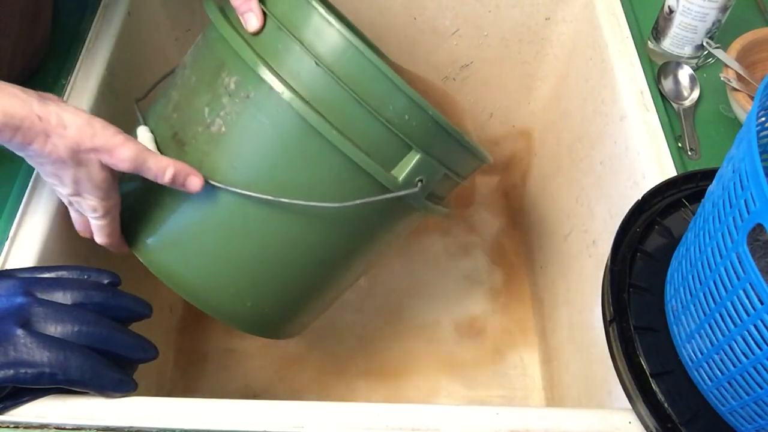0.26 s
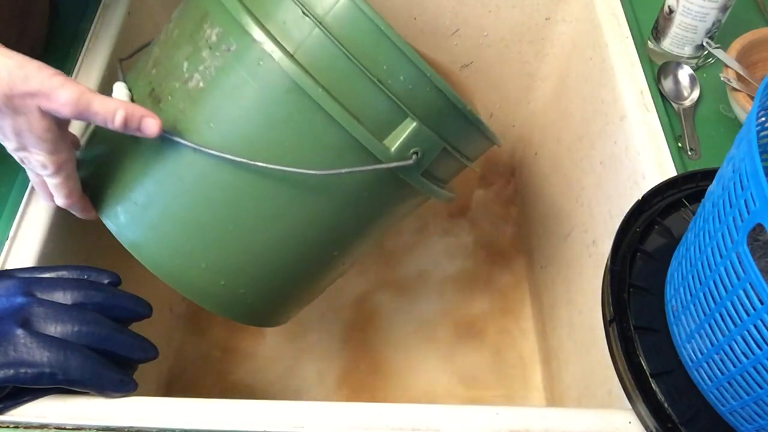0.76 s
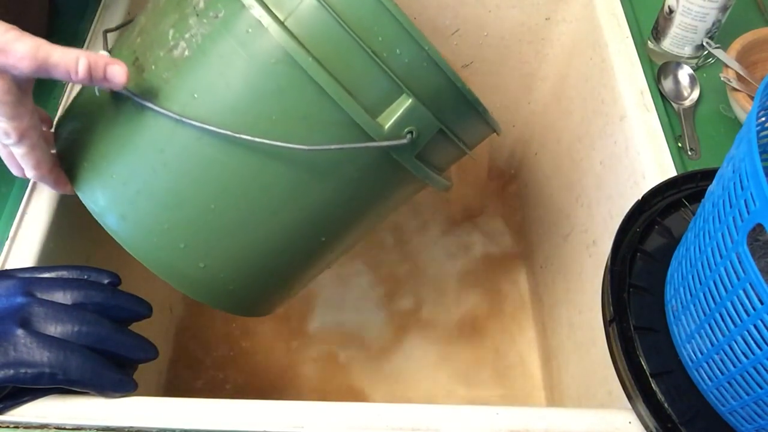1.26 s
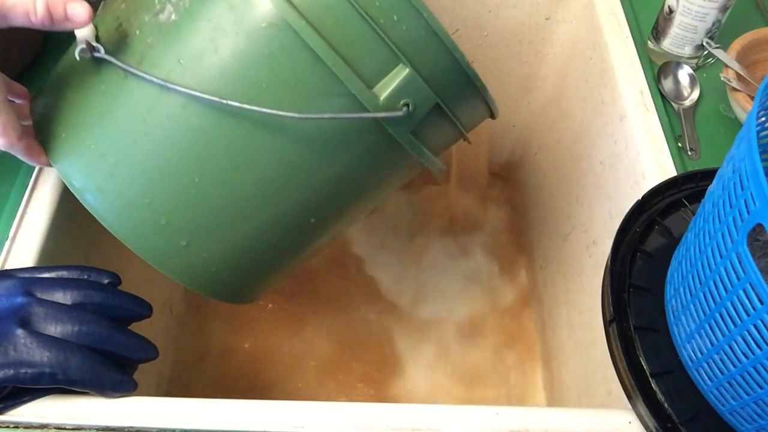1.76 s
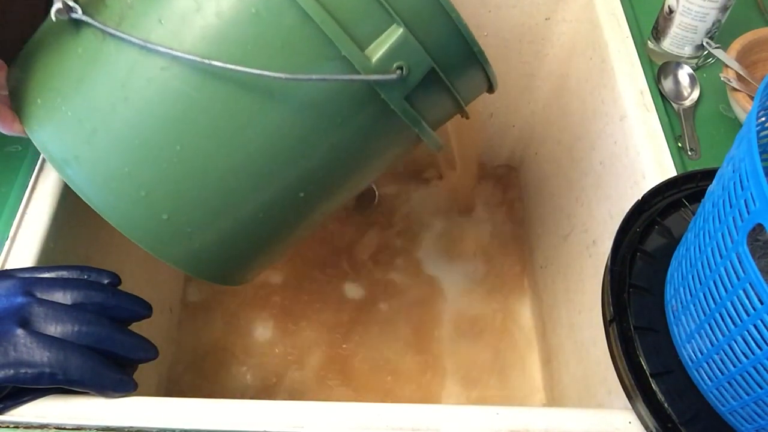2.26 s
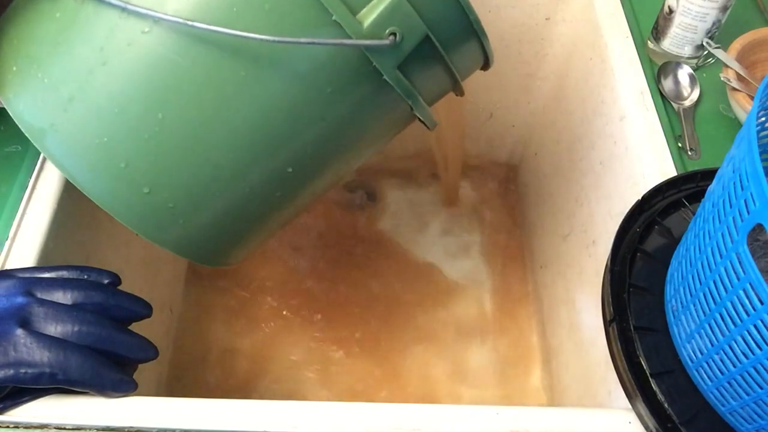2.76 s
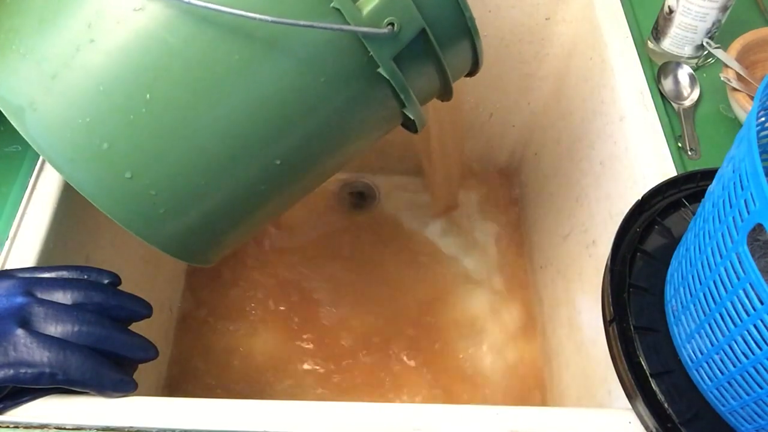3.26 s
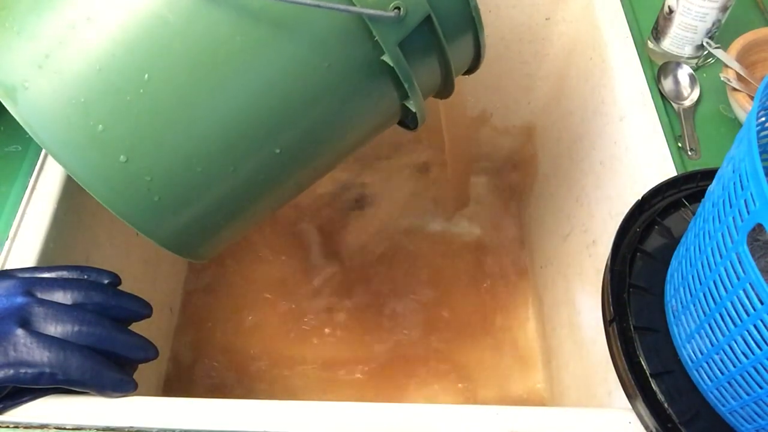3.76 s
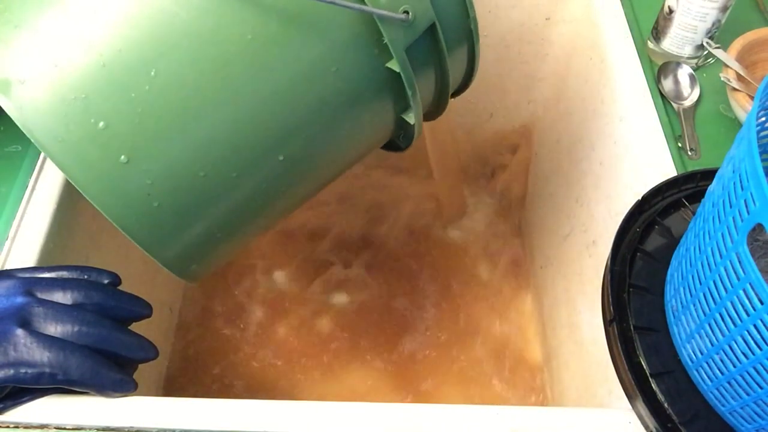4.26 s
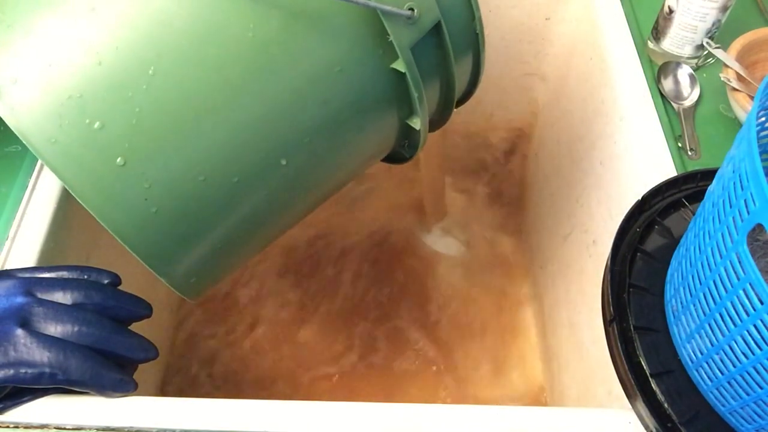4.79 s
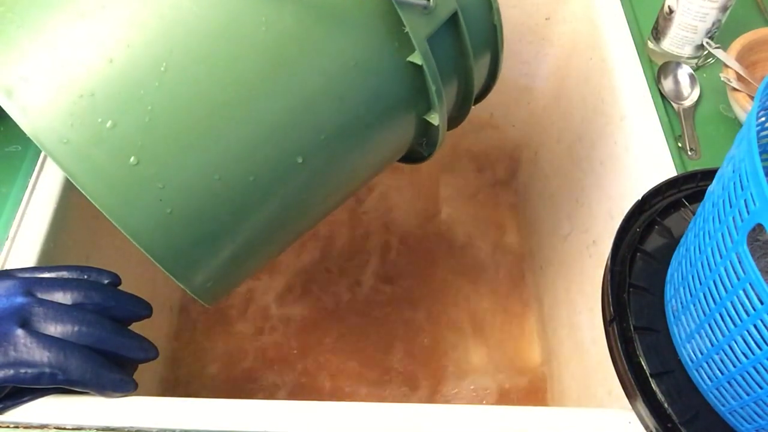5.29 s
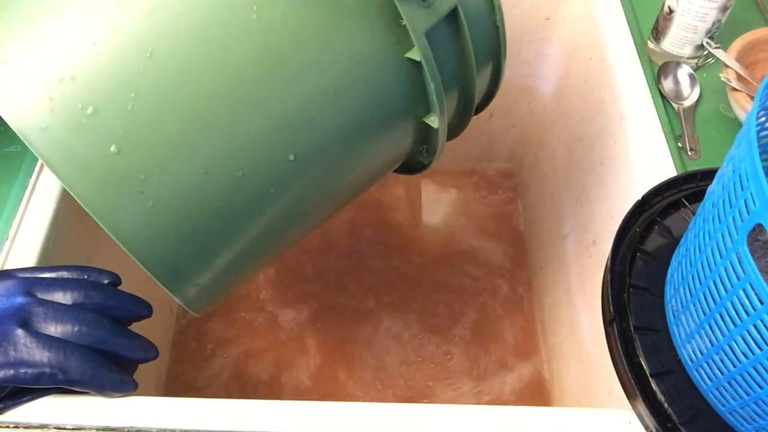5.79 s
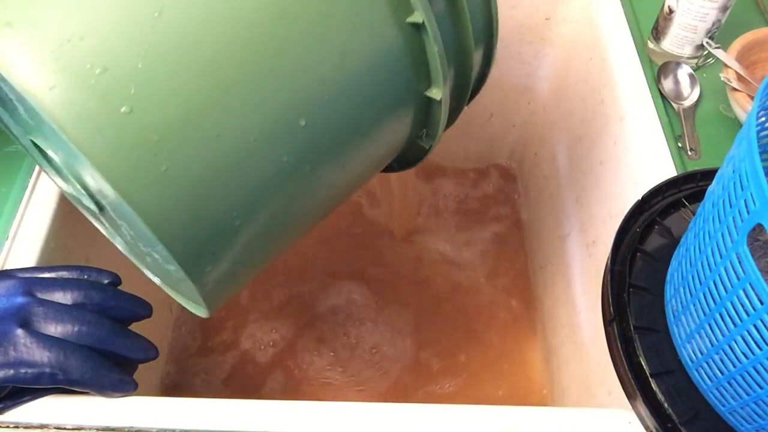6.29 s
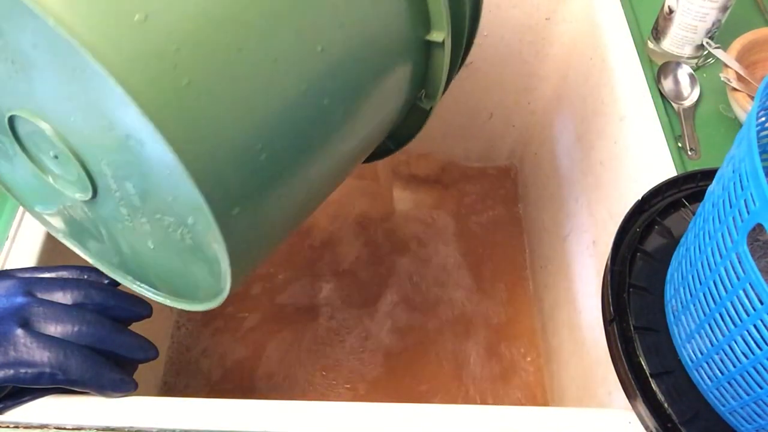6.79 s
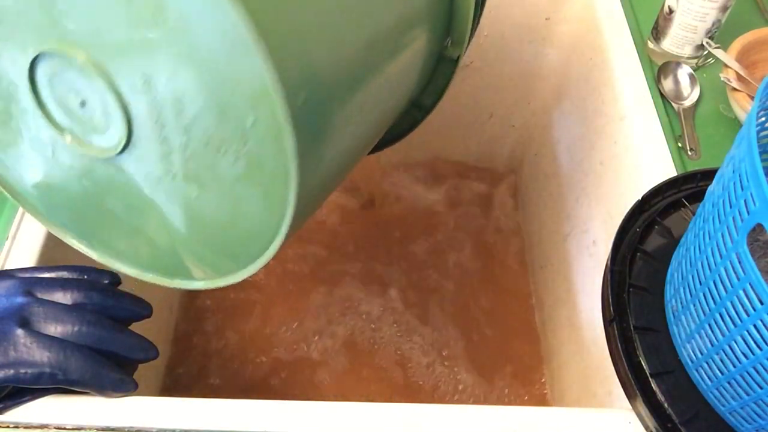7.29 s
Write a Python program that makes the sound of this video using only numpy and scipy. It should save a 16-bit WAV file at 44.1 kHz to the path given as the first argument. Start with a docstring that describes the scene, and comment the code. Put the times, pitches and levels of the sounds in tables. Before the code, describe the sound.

Close-up water gushes from a tipped bucket into a deep basin, starting thin, growing fuller and lower with gurgles and thumps, then weakening and surging briefly.

```python
"""A deep utility sink, heard close up: a bucket is emptied into it, the same in both channels.
The stream hisses as spray (tiny ringing drops over noise), drives clouds of bubbles into the pool (damped
sines that rise in pitch) and drums on the floor (random impacts through the modes of the basin).
Plunges, thumps, slaps, gulps and ticks on the wall stand out at listed times. Plinks, gurgles and blips
scatter at random, and short noise tails make the walls of the basin answer."""
import sys
import numpy as np
from scipy import signal
from scipy.fft import rfft, irfft, next_fast_len
from scipy.io import wavfile
from scipy.ndimage import map_coordinates

SR = 44100
rng = np.random.default_rng(int(sys.argv[2]) if len(sys.argv) > 2 else 0)


def store_wav(level_fs):
    """Save 16-bit WAV to argv[1]."""
    pcm = np.round(np.clip(np.atleast_2d(level_fs), -1, 1) * 32767)
    wavfile.write(sys.argv[1], SR, pcm.T.astype(np.int16))


N = 332646
TIME = np.arange(N) / SR

# colour of the mist: (frequency [Hz], filter gain [dB])
SPRAY_COLOUR = [(500, -69), (1200, -10), (3000, -4.5), (5000, -5), (7300, -6), (9000, -4), (10500, -5),
                (12000, -2.5), (13500, 0.5), (15500, -2)]
COARSE_PER_FLOW = 0.13  # a weak stream throws fewer coarse droplets (extra dB per dB of flow)


def spray(level_db, flow_db, count=30000, size=48):
    """Countless droplets and tiny bubbles crackle over a fine mist, in quick spurts."""
    start = rng.uniform(0, N / SR, count)
    hz = rng.uniform(2500, 16000, count)
    gain = amp(2 * bounded_normal(count)) * np.sqrt(hz)
    crackle = unit(bubbles(start, hz, gain, cycles=2, rise=0, size=size))
    mist = 1.2 * rng.standard_normal(N)
    hiss = filtered(crackle + mist, lambda f: amp(along(SPRAY_COLOUR, f)))
    hiss = band_unit(hiss, 7300, 13760)
    # coarse and fine droplets each spurt by themselves, and also together as the stream gushes
    coarse = lowpass(hiss, 11500, order=12)
    fine = hiss - coarse
    coarse = coarse * amp(COARSE_PER_FLOW * flow_db)
    hiss = sum(part * spurts(depth_db=1.17, life=0.014, count=500) for part in (coarse, fine))
    gush = spurts(depth_db=1.03, life=0.01, count=500)
    return walls(hiss * gush, wet_db=-8.5) * amp(level_db)


# colour of the bubbling: (frequency [Hz], filter gain [dB])
FROTH_COLOUR = [(500, -34), (950, -6), (1200, -2), (1800, -3.5), (2400, -3.5), (3400, -0.5), (4200, -4),
                (5300, -5), (7000, -11), (12000, -17)]
# the biggest bubbles need depth to form: gain [dB], change with depth [dB per dB]
BIGGEST_DB, BIGGEST_PER_POOL = 1, 0.36


def froth(large_db, small_db, clump_db, pool_db, count=3200, size=600):
    """Each blob of the stream drags under a cloud of bubbles of similar size."""
    cloud = rng.integers(0, count, size=11000)  # the blob that each bubble belongs to
    bubble_count = len(cloud)
    start = rng.uniform(0, N / SR, count)[cloud] + .007 * rng.exponential(1, bubble_count)
    hz = 900 * (7000 / 900) ** (rng.random(count) ** .6)[cloud]
    hz *= np.exp(0.1273 * rng.standard_normal(bubble_count))
    gain_db = 1.4 * bounded_normal(count)[cloud] + 2 * bounded_normal(bubble_count)
    gain = amp(gain_db) * hz ** .75 * rng.choice([-1, 1], bubble_count)
    # small bubbles ring for more cycles than large ones
    cycles = 9 * np.sqrt(hz[:, None] / 2500)
    fizz = unit(bubbles(start, hz, gain, cycles, rise=.02, size=size))
    fizz = walls(fizz + .2 * rng.standard_normal(N), wet_db=-4)
    fizz = filtered(fizz, lambda f: amp(along(FROTH_COLOUR, f)) * hollow(f))
    large = lowpass(fizz, 2600)
    small = band_unit(fizz - large, 2600, 5500) * amp(small_db)
    large = band_unit(large, 770, 3470) * amp(large_db)
    biggest = lowpass(large, 1500)
    biggest_gain = amp(BIGGEST_DB + BIGGEST_PER_POOL * np.maximum(pool_db, -3))
    large = large - biggest + biggest * biggest_gain
    return sum(part * spurts(clump_db, life=.025, count=250) for part in (large, small))


TILT_PER_POOL = 0.4  # deeper water shifts the patter to the upper modes (dB per dB of depth)


def drumming(patter_db, pool_db, weight_db, ring_db):
    """Drops patter on the upper modes of the floor; the stream's weight shakes the low ones."""
    def low(f):
        return 1 / (1 + (f / 290) ** 4) ** 2

    patter = filtered(impacts(spread_db=3.5, count=4500), lambda f: basin(f) * (1 - low(f)))
    patter = sloshed(patter, pool_db)
    tilt_db = TILT_PER_POOL * pool_db
    dull = lowpass(patter, 650)
    patter = dull * amp(-tilt_db / 2) + (patter - dull) * amp(tilt_db / 2)

    rumble = impacts(spread_db=2.0, count=3500)
    rumble = filtered(rumble, lambda f: basin(f) * low(f) / (1 + (42 / (f + 1)) ** 6))
    deep = lowpass(rumble, 165)
    ring = amp(ring_db)
    # the divisor offsets the change in loudness as the ring grows
    rumble = (deep + ring * (rumble - deep)) / np.sqrt(0.58 + 0.38 * ring ** 2)
    return band_unit(patter, 313, 906) * amp(patter_db) + band_unit(rumble, 40, 202) * amp(weight_db)


SLOSH, SLOSH_HZ = 0.01402, 5  # random detuning (share), random points a second
DETUNE_PER_POOL = .003  # depth raises the pitch (share per dB of depth above 0 dB)


def sloshed(x, pool_db):
    """The moving load of water bends the pitch of the floor's modes."""
    knots = rng.standard_normal(int(N / SR * SLOSH_HZ) + 4)
    wobble = SLOSH * map_coordinates(knots, [TIME * SLOSH_HZ])
    speed = 1 + wobble + DETUNE_PER_POOL * np.maximum(pool_db, 0)
    return map_coordinates(x, [np.cumsum(speed)], mode="mirror")


# plunges that release a burst of bubbles:
# (time [s], peak level before the echoes [dB], pitch [Hz], length [s], scatter of pitch [share])
PLUNGE_HITS = [(.003, -34, 3720, 0.038, 0.18), (0.028, -37.5, 1950, 0.031, 0.1),
               (0.169, -46, 1800, 0.045, .3), (0.187, -36, 5250, .022, .17),
               (0.265, -48, 3000, 0.028, 0.22), (0.406, -33.5, 2240, .025, 0.17),
               (.503, -33, 2670, .022, 0.45), (0.55, -30, 3250, .018, .08), (0.557, -33, 2200, 0.031, 0.16),
               (0.693, -28, 4000, .025, 0.33), (0.764, -33, 2500, .02, 0.12),
               (0.84, -31, 1650, 0.034, 0.18), (1.096, -33, 3200, .02, .02), (1.132, -35, 2260, .014, .05),
               (1.214, -32, 3180, 0.016, .02), (1.273, -27, 4230, .025, 0.14),
               (1.294, -26, 2210, 0.012, 0.13), (1.462, -26, 4120, 0.033, 0.16),
               (1.577, -33.5, 1870, .025, 0.1), (1.846, -31, 3170, .014, 0.047),
               (2.013, -26.5, 2030, 0.011, 0.13), (2.046, -25, 3540, .015, 0.15),
               (2.066, -30, 1800, 0.023, 0.081), (2.095, -29, 2220, .03, 0.13),
               (2.255, -29, 2630, .014, .06), (2.411, -28.5, 2100, 0.021, 0.13),
               (2.53, -34, 2300, 0.022, 0.056), (2.956, -35, 6290, .008, .04),
               (3.239, -31, 4150, 0.021, 0.16), (3.398, -30, 1710, .025, 0.14),
               (3.433, -30, 1610, 0.024, 0.15), (3.532, -29, 2170, .02, 0.37),
               (3.753, -23.5, 3400, 0.013, 0.047), (3.904, -24.5, 3260, .025, 0.091),
               (4.179, -23, 3360, 0.0057, 0.049), (4.189, -23.5, 1540, .008, 0.12),
               (4.27, -30, 1850, 0.0083, .15), (4.657, -30.5, 1520, 0.02, 0.11),
               (4.856, -26.5, 3780, .01, 0.14), (5.122, -25, 2190, 0.021, 0.13),
               (5.487, -29, 1840, 0.017, 0.24), (5.841, -37, 1880, .012, .03),
               (5.894, -34.5, 1550, 0.011, 0.18), (5.951, -33, 2100, 0.014, 0.14),
               (5.979, -34, 1380, 0.021, 0.11), (6.026, -30, 1580, 0.015, 0.16),
               (6.151, -34, 2300, 0.019, 0.045), (6.186, -37, 1700, .006, 0.12),
               (6.211, -33, 3480, 0.024, 0.23), (6.267, -35, 4800, 0.012, 0.058),
               (6.308, -28.5, 3400, .006, 0.19), (6.308, -33, 5700, 0.022, 0.13),
               (6.339, -35, 5400, .012, 0.023), (6.38, -33, 2700, .02, 0.091),
               (6.442, -33, 2220, 0.029, 0.045), (6.66, -29, 1510, .013, 0.16),
               (6.714, -24, 3360, 0.01, 0.02), (6.987, -28.5, 1610, 0.029, 0.16),
               (7.07, -25.5, 1680, 0.019, 0.19), (7.383, -29.5, 2150, 0.014, 0.065)]


def plunges(count=16):
    """A burst of loud bubbles around one pitch; the more alike they are, the longer they ring."""
    out = np.zeros(N)
    for s, db, hz, length, spread in PLUNGE_HITS:
        lag, detune, sign = rng.random((3, count))
        start = s + length * (np.arange(count) + lag) / count
        pitch = hz * np.exp(spread * np.sqrt(3) * (2 * detune - 1))
        fade = np.linspace(1, .5, count) * np.sign(sign - .5)
        burst = bubbles(start, pitch, fade, cycles=1.2 + 0.23 / max(spread, .02), rise=0.032)
        out += amp(db) * burst / np.abs(burst).max()
    return walls(out, wet_db=-13.5)


# slugs of water that shake the floor: (time [s], level before the decay [dB], pitch [Hz], t60 [s])
THUMP_HITS = [(0.051, -38.5, 71.5, 0.3), (.078, -39, 215, 0.12), (.228, -42, 134, .2),
              (0.515, -41, 197, 0.25), (0.576, -38, 76, .28), (.752, -37, 66, 0.28), (0.989, -37, 210, .45),
              (1.149, -37.5, 215.6, 0.35), (1.619, -39, 205.5, .28), (1.623, -36, 121, .28),
              (1.82, -41, 210, 0.34), (1.876, -36, 205.5, 0.25), (2.238, -42, 193, .2),
              (3.074, -43, 208, 0.28), (3.11, -37, 159, 0.25), (3.222, -41, 217, 0.22),
              (3.493, -38.5, 204, 0.23), (4.467, -36.5, 113, .35), (4.684, -28.5, 109, 0.45),
              (4.69, -34, 72, .3), (4.744, -39, 226, .25), (4.778, -32, 79.5, 0.34),
              (4.975, -35.5, 99, 0.27), (5.108, -27.5, 199, 0.14), (5.372, -39, 66, 0.23),
              (5.645, -42, 216, .25), (6.03, -43, 215, .2), (6.233, -39, 213.5, 0.22),
              (7.246, -34, 112, 0.23)]


def thumps():
    """The loaded floor swings under each slug as a decaying sine with a soft onset."""
    out, t = np.zeros(N), TIME[:SR // 2]
    for s, db, hz, t60 in THUMP_HITS:
        swing = amp(-60 * t / t60) * (1 - np.exp(-t / .005))
        add(out, s, amp(db) * swing * np.sin(2 * np.pi * hz * t))
    return out


# flat slaps of water on the floor: (time [s], level before 2 dB of boost and the floor's response [dB])
SLAP_HITS = [(0.225, -32.5), (.975, -34), (1.957, -33), (2.222, -37), (2.582, -32), (2.599, -32),
             (2.639, -34), (3.069, -30), (3.09, -26), (3.114, -26.5), (3.14, -22.5), (3.204, -26.5),
             (3.228, -34), (3.642, -26.5), (4.647, -24.5)]
# colour of a slap: (frequency [Hz], filter gain [dB])
CONTACT_COLOUR = [(60, -25), (150, 3.5), (215, 4.5), (300, 2.5), (420, 6), (560, 2), (750, -4), (1500, -34)]
CHURN, CHURN_S = 0.7, 0.03  # size of the churn against the push; its decay time (s)


def slaps():
    """A short push on the floor and a longer churn of water excite the modes of the basin."""
    force, t = np.zeros(N), TIME[:SR // 8]
    for s, db in SLAP_HITS:
        push = np.exp(-t / .0007)
        churn = CHURN * rng.standard_normal(len(t)) * np.exp(-t / CHURN_S)
        add(force, s, amp(db + 2) * (push + churn))
    return filtered(force, lambda f: basin(f) * amp(along(CONTACT_COLOUR, f)))


# large pockets of trapped air: (time [s], level before 4.5 dB of boost [dB], pitch [Hz])
GULP_HITS = [(.225, -48, 390), (.29, -42.5, 785), (.468, -43, 754), (.508, -43, 750), (.541, -47, 790),
             (.63, -46, 755), (.837, -40.5, 1020), (.841, -45, 766), (.873, -39, 1100), (1.09, -41, 795),
             (1.191, -45, 750), (1.632, -33.5, 1110), (1.733, -45, 735), (2.22, -42, 417), (2.42, -44, 390),
             (2.58, -40, 750), (2.594, -48, 390), (2.675, -42.5, 740), (2.853, -37, 760), (2.882, -42, 746),
             (2.96, -32.5, 763), (2.969, -44, 900), (3.138, -34.5, 730), (3.435, -37, 725),
             (3.638, -38, 378), (4.395, -39, 716), (4.645, -37, 970), (4.805, -39, 950), (5.15, -43, 585),
             (5.342, -39, 780), (5.867, -42, 770), (6.778, -41, 770), (7.036, -40, 740),
             (7.155, -35.5, 805)]


def gulps():
    """Big bubbles ring low in the pool, each a damped sine that rises slightly."""
    s, db, hz = np.transpose(GULP_HITS)
    ring = bubbles(s, hz, amp(db + 4.5), cycles=7, rise=.012, size=2000)
    return walls(ring, wet_db=-11)


# stray drops that smack the walls:
# (time [s], level before 5.5 dB of cut [dB], decay time [s], high-pass cutoff [Hz])
SMACK_HITS = [(.551, -20, .0043, 7000), (1.262, -22, .01, 6000), (1.273, -17, 0.0071, 7000),
              (3.349, -11, 0.00086, 6000), (3.647, -16, .001, 6000), (4.755, -19.5, 0.0089, 8000),
              (4.937, -14, .0016, 8000), (5.613, -25.5, 0.012, 6000), (6.257, -15.5, 0.007, 12400),
              (6.455, -22, 0.0023, 6000), (7.208, -24, .01, 10000)]


def smacks():
    """Single drops burst on the wall with a bright tick of high-passed, decaying noise."""
    out, t = np.zeros(N), TIME[:SR // 25]
    for s, db, decay, low_hz in SMACK_HITS:
        highpass = signal.butter(4, low_hz, "highpass", fs=SR, output="sos")
        tick = signal.sosfilt(highpass, rng.standard_normal(len(t)))
        add(out, s, amp(db - 5.5) * tick * np.exp(-t / decay))
    return walls(out, wet_db=-10)


# deeper water makes bigger single bubbles: (pool depth [dB], lowest pitch [Hz])
PLINK_FLOOR = [(-15.5, 2300), (-.5, 1450), (2, 1150)]


def plinks(level_db, pool_db, count=1100):
    """Single bubbles ring out as short rising notes; small ones last more cycles."""
    start, pitch, strength = rng.random((count, 3)).T
    high_hz, range_db = 6400, 12
    low_hz = np.interp(pool_db[(start * N).astype(int)], *np.transpose(PLINK_FLOOR))
    hz = low_hz * (high_hz / low_hz) ** pitch
    cycles = 33 * np.sqrt(hz[:, None] / 2500)
    gain = amp(range_db * strength ** 2)
    notes = bubbles(start * N / SR, hz, gain, cycles, rise=0.008, size=1900)
    return unit(filtered(walls(notes, wet_db=-8), hollow)) * amp(level_db)


def gurgles(count=440):
    """Big bubbles of many sizes wobble up through the pool, each a short rising note."""
    start, pitch, strength = rng.random((count, 3)).T
    low_hz, high_hz, range_db = 310, 1200, 12
    hz = low_hz * (high_hz / low_hz) ** pitch
    notes = bubbles(start * N / SR, hz, amp(range_db * strength), cycles=18.4, rise=0.074, size=2400)
    # the basin colours them only gently
    return unit(filtered(notes, lambda f: np.abs(basin(f)) ** .3))


def droplets(level_db, count=3600):
    """Drops thrown up by the splash fall back close by, each a dry little blip."""
    start, pitch, strength = rng.random((count, 3)).T
    low_hz, high_hz, range_db = 1400, 6200, 16
    hz = low_hz * (high_hz / low_hz) ** pitch
    blips = bubbles(start * N / SR, hz, amp(range_db * strength ** 2), cycles=9, rise=.04, size=500)
    return unit(blips) * amp(level_db)


# modes of the basin's panels: (frequency [Hz], width [Hz], gain of the mode alone [dB])
BASIN_MODES = [(64, 12, -10), (77.4, 28.6, -3.5), (119.6, 13.7, -1.5), (164, 62, -8), (219, 16.6, 0.5),
               (299, 81, -3.5), (381, 57, -0.5), (409, 18, 1.5), (556, 22, -1), (596, 22, 0.5),
               (733.4, 49, 8.5), (830, 17, -12), (966, 82, 1.5)]


def basin(f):
    """Response of the basin's panels: the deepest bass hardly radiates, and they cancel in one narrow band."""
    modes = sum(amp(db) * 1j * f * w / (hz * hz - f * f + 1j * f * w) for hz, w, db in BASIN_MODES)
    null_hz, null_width = 490, 25
    null = (null_hz ** 2 - f * f) / (null_hz ** 2 - f * f + 1j * f * null_width)
    radiation = f ** 2 / (f ** 2 + 40 ** 2)
    return modes * null * radiation / (1 + (f / 1300) ** 2)


# resonances of the air between the walls: (frequency [Hz], width [Hz], peak boost [dB])
AIR_MODES = [(1250, 52, 6), (1390, 30, 2), (1516, 59, 3.5), (1870, 110, 4.5), (2303, 100, 5.5),
             (2540, 210, 4), (3230, 160, 2.5), (3500, 130, 1.5)]


def hollow(f):
    """Gain of the air between the walls: broad peaks that add up in dB."""
    return amp(sum(db / (1 + (2 * (f - centre) / width) ** 2) for centre, width, db in AIR_MODES))


# decay of the echoes: (frequency [Hz], t60 [s])
WALL_DECAY = [(200, 0.034), (1500, 0.49), (5000, 0.13), (15000, 0.0058)]


def walls(x, wet_db, count=8):
    """Dense short echoes: the water crossfades through a cycle of landing spots, each with its own tail."""
    hz, t, z = signal.stft(rng.standard_normal((count, SR // 8)), SR, nperseg=256)
    decay = amp(-60 * t / along(WALL_DECAY, hz)[:, None])
    tails = signal.istft(z * decay, SR, nperseg=256)[1]
    tails /= np.linalg.norm(tails, axis=1, keepdims=True)
    spot = TIME * 14  # 14 spots a second
    echo = np.zeros(N)
    for k, tail in enumerate(tails):
        share = np.maximum(0, 1 - np.abs((spot + k) % count - 1))
        echo += signal.oaconvolve(x * np.sqrt(share), tail)[:N]
    return (x + amp(wet_db) * echo) / np.hypot(1, amp(wet_db))


def bubbles(s, hz, gain, cycles, rise, size=700):
    """Damped sines that climb in pitch as each bubble nears the surface."""
    age = np.arange(size)
    turns = hz[:, None] * age / SR
    life = turns / cycles
    ring = np.sin(2 * np.pi * turns * (1 + rise * life / 2))
    ring = ring * np.exp(-life) * (1 - np.exp(-2 * turns))
    at = (np.maximum(s, 0) * SR).astype(int)[:, None] + age
    sound = gain[:, None] * ring * (1 - age / size)
    return np.bincount(at.ravel(), sound.ravel(), N)[:N]


def impacts(spread_db, count):
    """Drop impacts at random moments, with log-normal sizes of limited range."""
    size = amp(spread_db * bounded_normal(count)) * rng.choice([-1, 1], count)
    return np.bincount(rng.integers(0, N, count), size, N)


def spurts(depth_db, life, count):
    """A level that jumps at random moments and sinks back over its life in seconds."""
    jumps = np.bincount(rng.integers(0, N, count), rng.exponential(1, count), N)
    swell = signal.lfilter([1], [1, -np.exp(-1 / (life * SR))], jumps)
    return amp(depth_db * np.minimum(unit(swell - swell.mean()), 2.5))


def bounded_normal(count):
    """Normal draws held within two deviations."""
    return np.clip(rng.standard_normal(count), -2, 2)


def amp(db):
    """Amplitude of a level in dB."""
    return 10 ** (np.asarray(db) / 20)


def unit(x):
    """x scaled to rms 1."""
    return x / np.sqrt(np.mean(x ** 2) + 1e-20)


def along(points, hz):
    """Interpolate (Hz, value) points on a log axis."""
    f, v = np.transpose(points)
    return np.interp(np.log(hz + 1), np.log(f + 1), v)


def filtered(x, response):
    """x times a complex response of frequency."""
    m = next_fast_len(N + SR // 2)
    return irfft(rfft(x, m) * response(np.fft.rfftfreq(m, 1 / SR)), m)[:N]


def lowpass(x, hz, order=8):
    """The part of x below a frequency, without phase shift."""
    return filtered(x, lambda f: 1 / (1 + (f / hz) ** order))


def band_unit(x, lo_hz, hi_hz):
    """x scaled to rms 1 within a band."""
    return x / filtered(x, lambda f: (f > lo_hz) & (f < hi_hz)).std()


def add(track, s, sound):
    """Mix a sound in at time s."""
    part = track[max(0, round(s * SR)):][:len(sound)]
    part += sound[:len(part)]


def curves(rows):
    """One value per sample for each column after the time."""
    s, *columns = np.transpose(rows)
    return [np.interp(TIME, s, c) for c in columns]


def swells(rows):
    """Each event swells and ebbs in one smooth arch; one curve for each column after the length."""
    rows = np.array(rows)
    middle, length = rows[:, :1], rows[:, 1:2]
    arches = np.cos(np.pi * np.clip((TIME - middle) / length, -.5, .5))
    return rows[:, 2:].T @ arches


def follows(law, flow_db, pool_db):
    """Level of a layer in dB for a given flow and depth of the pool."""
    steady_db, per_flow, per_pool = law
    return steady_db + per_flow * flow_db + per_pool * pool_db


# the tilt of the bucket sets the flow: (time [s], flow re a steady pour [dB])
FLOW_CURVE = [(0, -3.5), (.1, -4.5), (.155, -8), (.19, -5.5), (.31, -3.5), (.54, 1), (.92, -1.5),
              (1.15, 0.5), (1.55, 1.5), (1.72, -0.5), (1.86, 1.5), (2.38, 1.5), (2.48, 0), (2.81, -.3),
              (2.86, -5), (2.94, -8), (3.02, -6), (3.11, -3.5), (3.155, 1), (3.195, -3.5), (3.245, 1.5),
              (4.87, 3.5), (5.42, 1.5), (5.7, -5.5), (6.08, -7.5), (6.31, -5), (6.39, -6.5), (6.48, -3),
              (7.22, 0), (7.45, -8)]
# the pool covers the floor, then deepens: (time [s], depth [dB])
POOL_CURVE = [(.14, -14.5), (.34, -11), (.54, -0.5), (3.1, -0.5), (4.9, 2), (5.8, 4), (7.54, 3.5)]
# patter of drops on the floor, before the breaks: (time [s], level [dB])
PATTER_CURVE = [(0.13, -58.5), (0.46, -57.5), (1.07, -54), (1.45, -56.5), (1.8, -52), (2.98, -55.5),
                (3.32, -51), (3.88, -51.5), (4.32, -48.5), (5.06, -47.5), (6.3, -53), (6.55, -56),
                (7.14, -48), (7.33, -53), (7.54, -60)]
# gushes that change how much air is dragged under: (middle [s], length [s], change in bubbling [dB])
GUSH_SWELLS = [(.7, 0.51, 3.5), (1.63, 0.13, 7), (2.09, 0.07, -1), (2.39, 0.13, 7), (2.7, 0.75, 6),
               (3.47, 0.26, 5.5), (3.95, 0.26, 7), (4.14, 0.31, 7.5), (4.67, 0.077, 6), (4.8, 0.16, 1.5),
               (5.21, 0.32, 6), (5.44, 0.22, 4), (6.5, 0.28, 2), (6.75, 0.18, 4.5), (7.17, 0.28, 3)]
# the stream breaks and drags less air under: (middle [s], length [s], change in bubbling [dB])
BREAK_DIPS = [(.115, 0.22, -11), (.235, 0.052, -7), (.325, 0.032, -4), (.475, 0.043, -6), (.96, 0.055, -2),
              (1.36, 0.068, -3.5), (3.185, 0.12, -9.5), (4.58, 0.047, -3.5), (5.0, 0.074, -2.5),
              (5.64, 0.063, -1.5), (6.09, 0.043, -4), (6.185, 0.034, -4), (6.93, 0.24, -1)]
# heavy surges that lean on the floor:
# (middle [s], length [s], added weight [dB], added ring near 200 Hz over the deeper modes [dB])
SURGE_SWELLS = [(.62, 0.3, 6.5, -1), (1.05, 0.48, 2, 4), (1.63, 0.75, 4, 6.5), (1.87, 0.15, 3.5, 5),
                (3.25, 0.63, 4.5, 2), (4.53, 0.39, 8.5, 1.5), (4.77, 0.29, 13, -1.5), (5.07, 0.55, 8, -1.5),
                (6.38, 0.82, 6, -4), (7.26, 0.37, 8, -2.5)]
# how each layer follows the pour, before gushes, surges and breaks:
# (level in a steady pour [dB], change with flow [dB per dB], change with pool depth [dB per dB])
SPRAY_FOLLOW = (-38.5, 1, -0.042)
LARGE_BUBBLE_FOLLOW = (-48.5, 0.4, 1)
SMALL_BUBBLE_FOLLOW = (-45.5, 0.79, 0.3)
PLINK_FOLLOW = (-48.5, 0.62, 0.7)
DROPLET_FOLLOW = (-49, .8, 0.3)
WEIGHT_FOLLOW = (-53, 0.042, 0.036)
SMALL_PER_GUSH, SPRAY_PER_GUSH = 0.33, 0.13  # small bubbles and spray gain these shares of a gush's dB
BREAK_SHARE = 0.46  # spray and drumming lose this share of a break's dB
# depth of the bubbling's spurts (dB); a thin stream breaks up more (dB per dB of lost flow)
CLUMP_DB, CLUMP_PER_THINNING = 0.5, 0.33
# ring near 200 Hz over the deeper modes (dB); the rising pool damps it (dB per dB of depth)
RING_DB, RING_PER_POOL = -1.5, -0.089
GURGLE_DB = -4.5  # gurgling against the patter


def scene():
    """Flow and pool depth drive the stream; single splashes sound on top."""
    flow_db, = curves(FLOW_CURVE)
    pool_db, = curves(POOL_CURVE)
    patter_db, = curves(PATTER_CURVE)
    gush_db, = swells(GUSH_SWELLS)
    break_db, = swells(BREAK_DIPS)
    surge_db, surge_ring_db = swells(SURGE_SWELLS)

    def level(law):
        return follows(law, flow_db, pool_db)

    mist = spray(level(SPRAY_FOLLOW) + SPRAY_PER_GUSH * gush_db, flow_db)
    large_db = level(LARGE_BUBBLE_FOLLOW) + gush_db
    small_db = level(SMALL_BUBBLE_FOLLOW) + SMALL_PER_GUSH * gush_db
    clump_db = CLUMP_DB + CLUMP_PER_THINNING * np.maximum(-flow_db, 0)
    bubbling = froth(large_db, small_db, clump_db, pool_db)
    bubbling += plinks(level(PLINK_FOLLOW), pool_db)
    bubbling += droplets(level(DROPLET_FOLLOW))
    bubbling += gurgles() * amp(patter_db + GURGLE_DB)
    ring_db = RING_DB + RING_PER_POOL * pool_db + surge_ring_db
    floor = drumming(patter_db, pool_db, level(WEIGHT_FOLLOW) + surge_db, ring_db)

    stream = (mist + floor) * amp(BREAK_SHARE * break_db) + bubbling * amp(break_db)
    mono = stream + plunges() + thumps() + slaps() + gulps() + smacks()
    return np.array([mono, mono])


TOP_HZ = 15330  # band limit


def record(dry):
    """Keep nothing above the band limit."""
    return np.array([filtered(x, lambda f: f < TOP_HZ) for x in dry])


dry = scene()
out = record(dry)
store_wav(out)
```